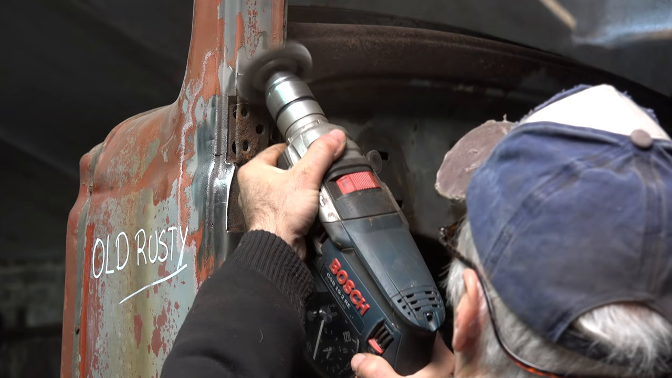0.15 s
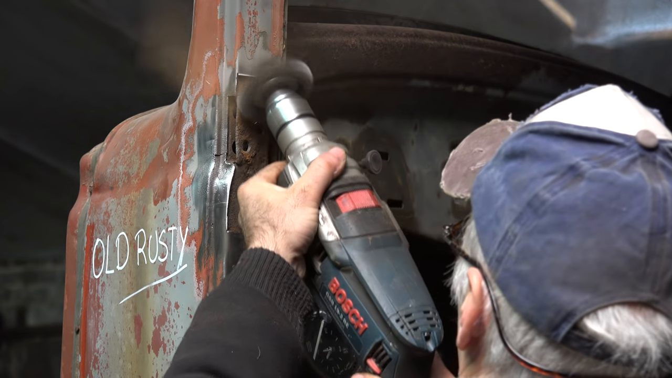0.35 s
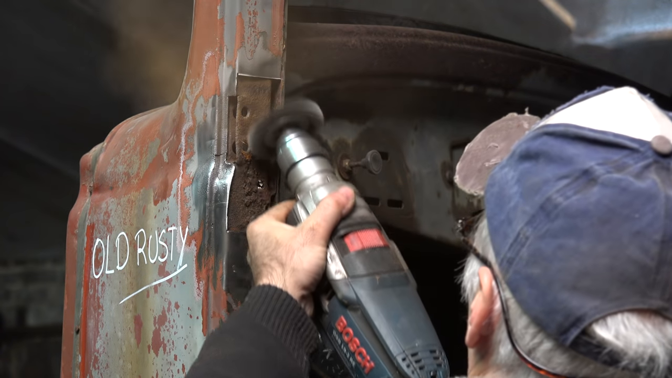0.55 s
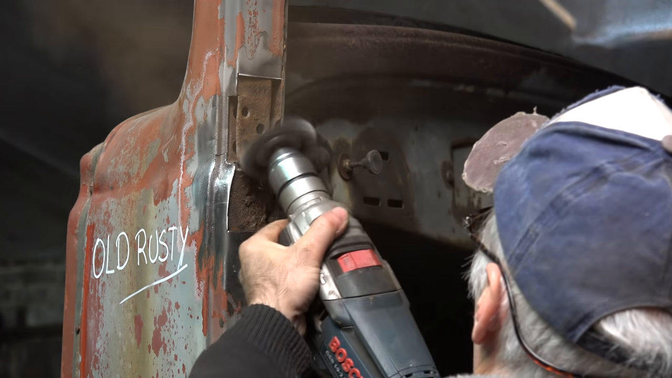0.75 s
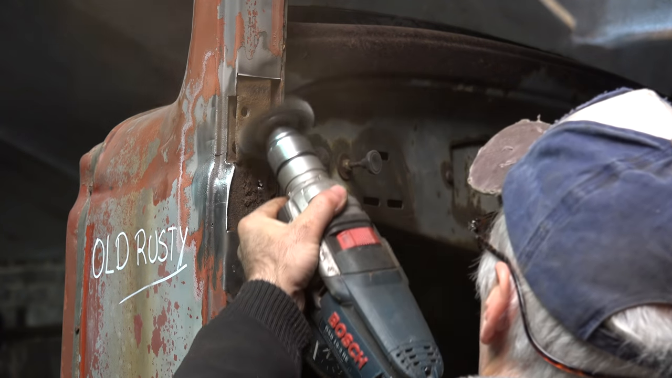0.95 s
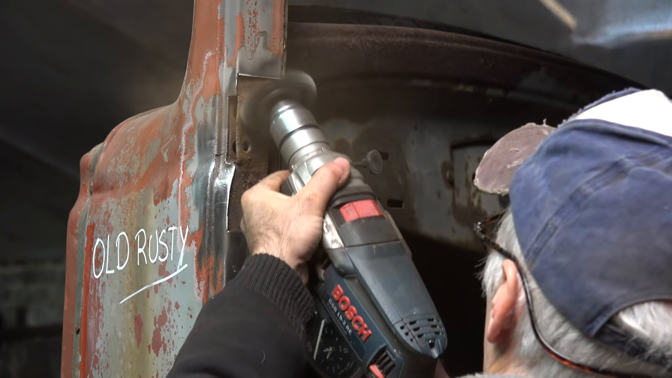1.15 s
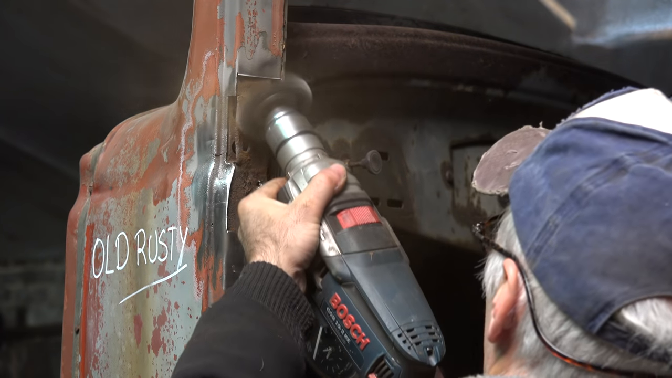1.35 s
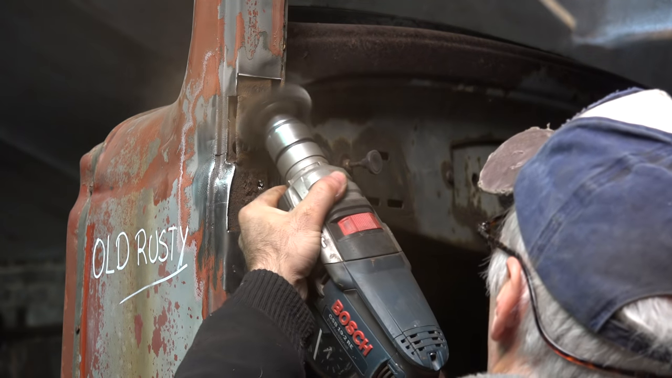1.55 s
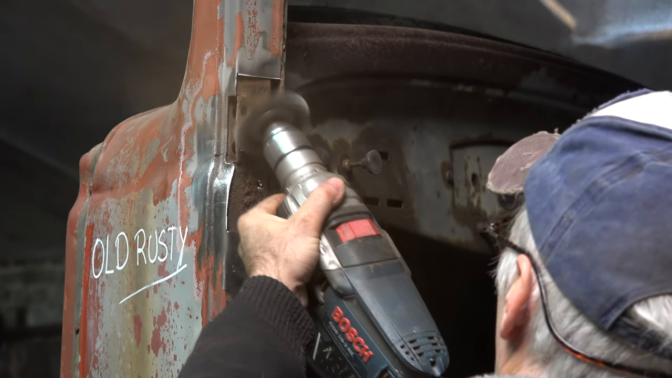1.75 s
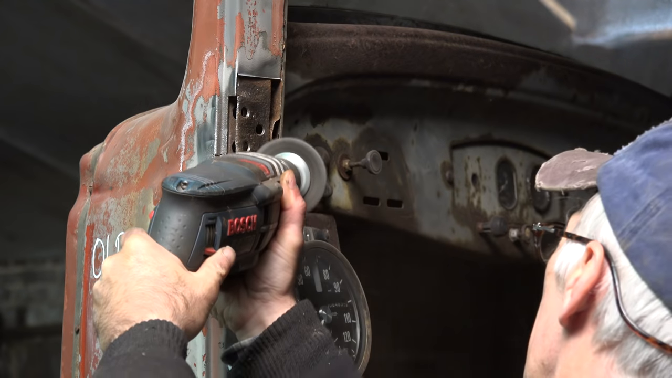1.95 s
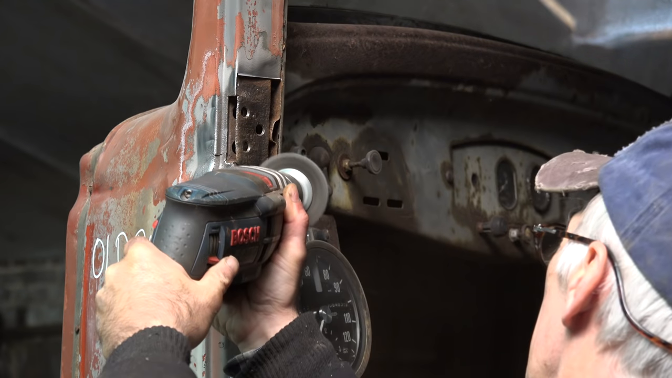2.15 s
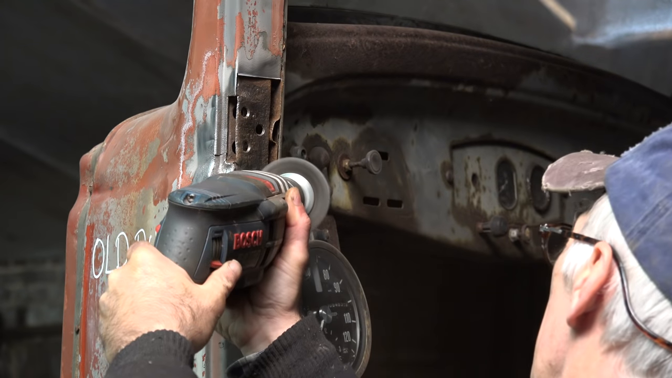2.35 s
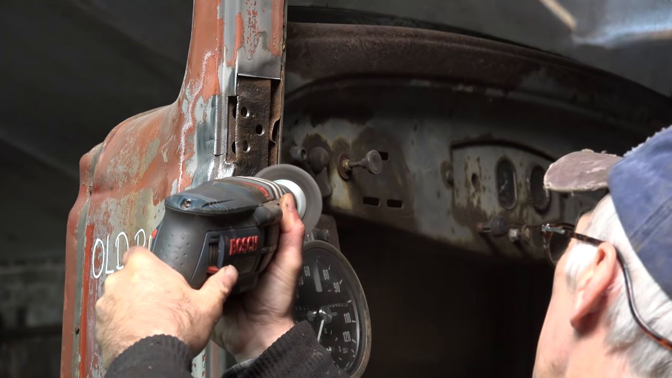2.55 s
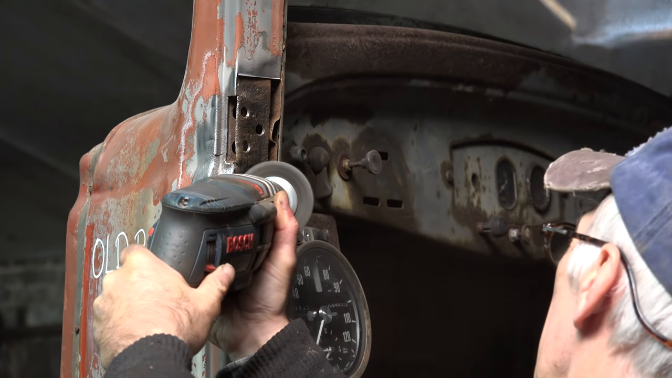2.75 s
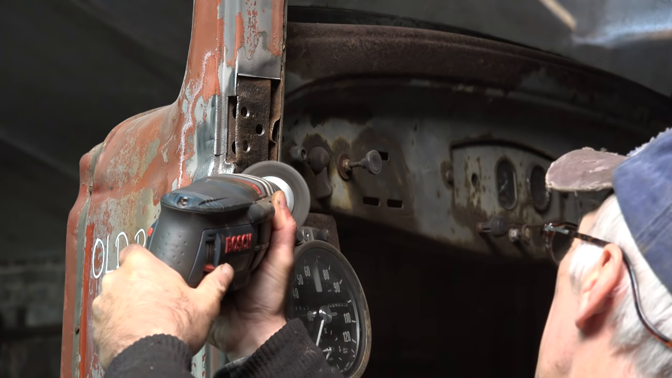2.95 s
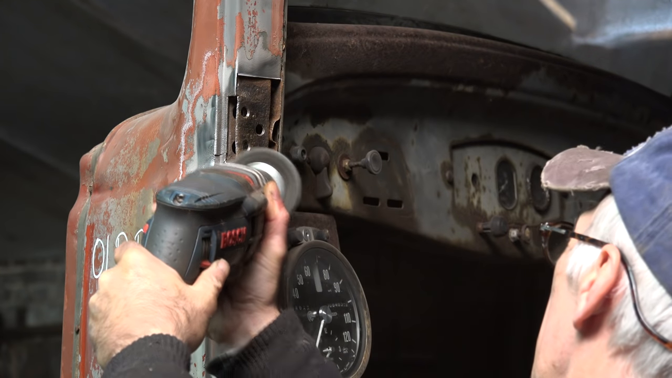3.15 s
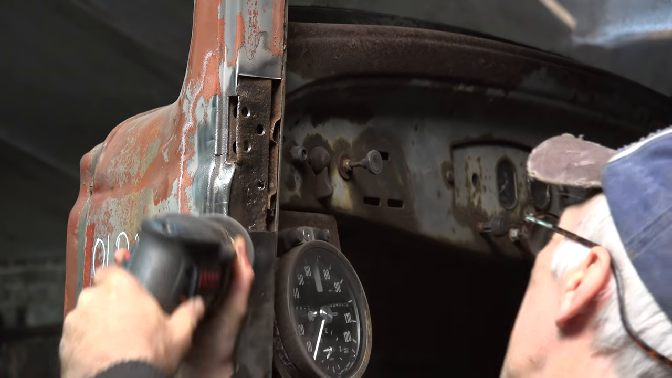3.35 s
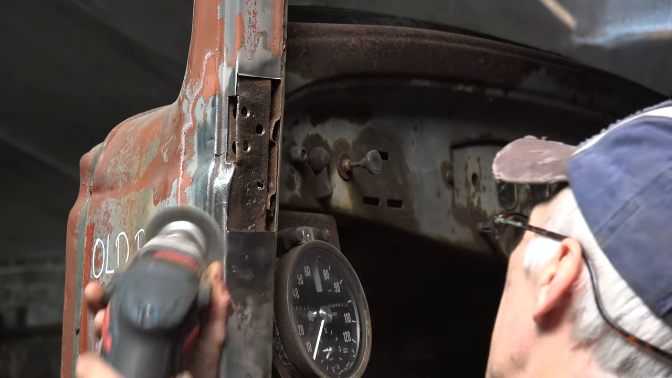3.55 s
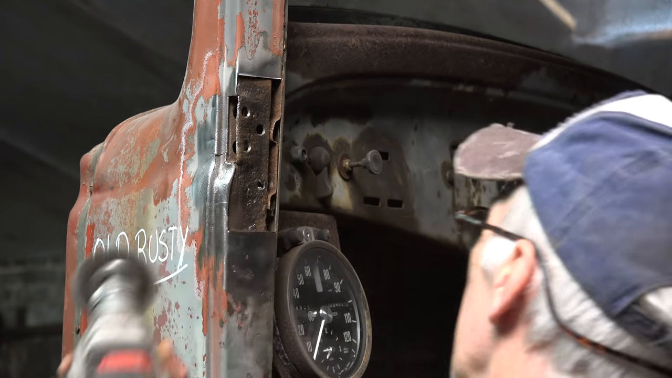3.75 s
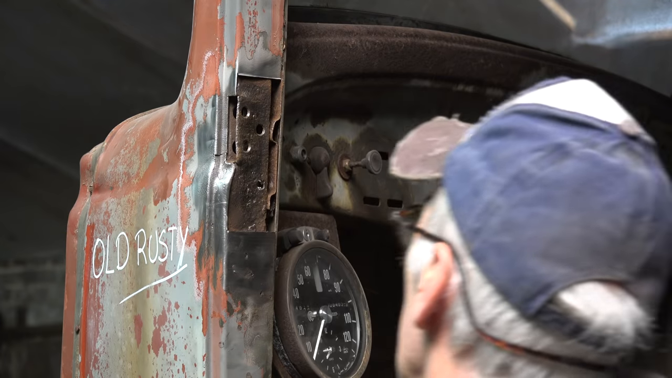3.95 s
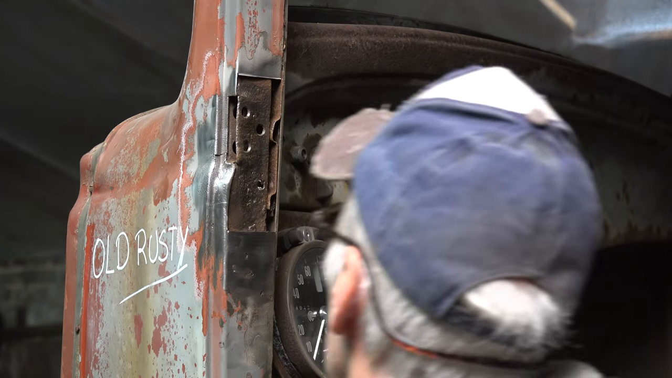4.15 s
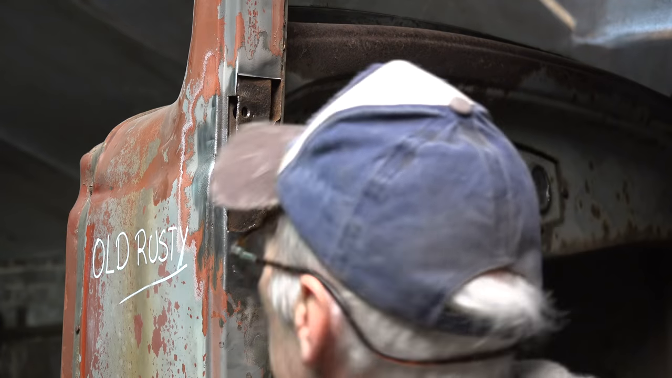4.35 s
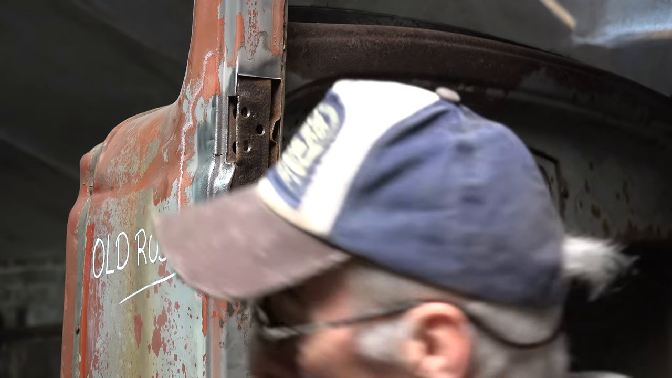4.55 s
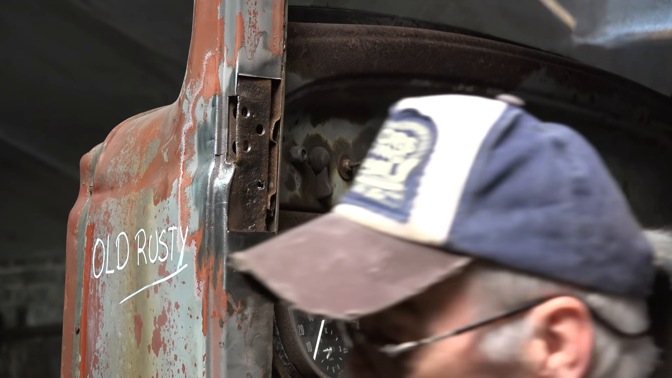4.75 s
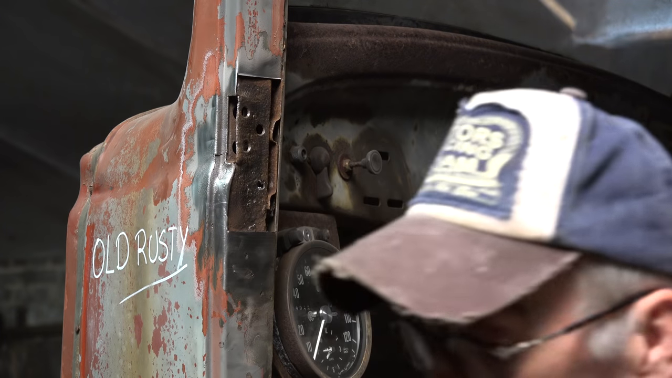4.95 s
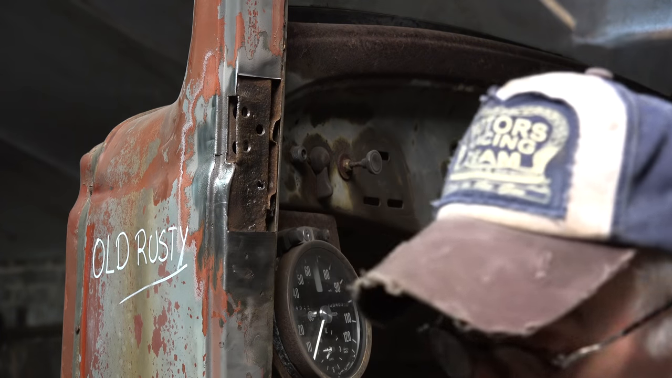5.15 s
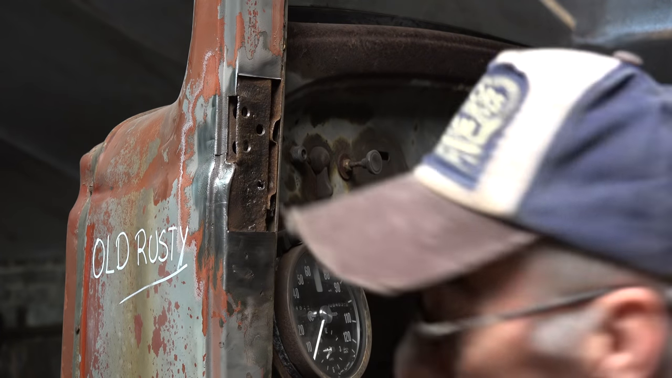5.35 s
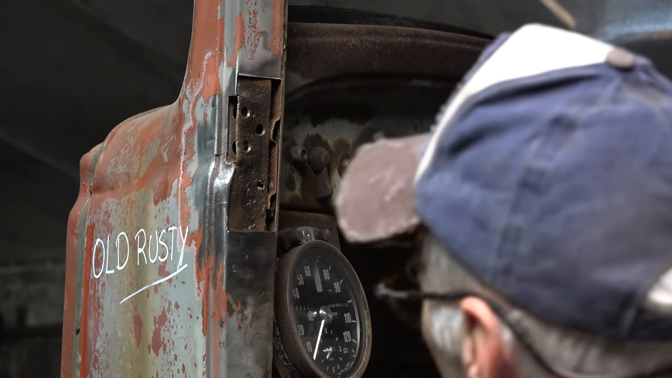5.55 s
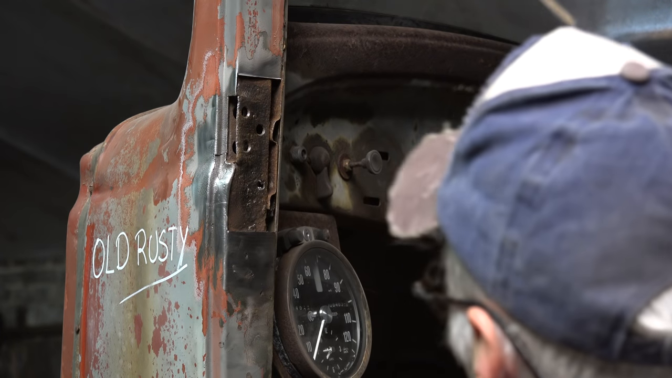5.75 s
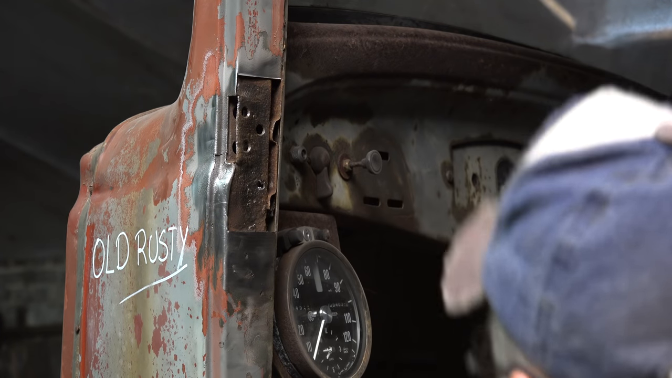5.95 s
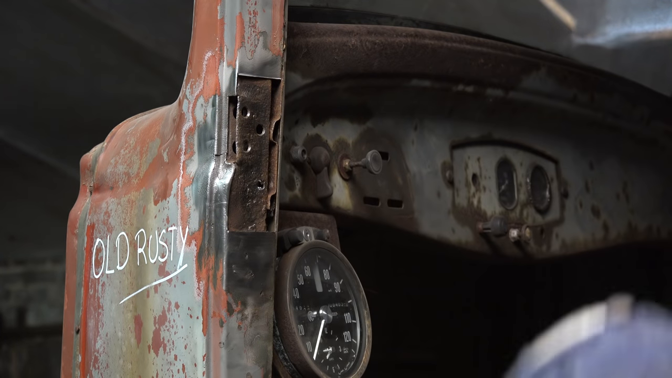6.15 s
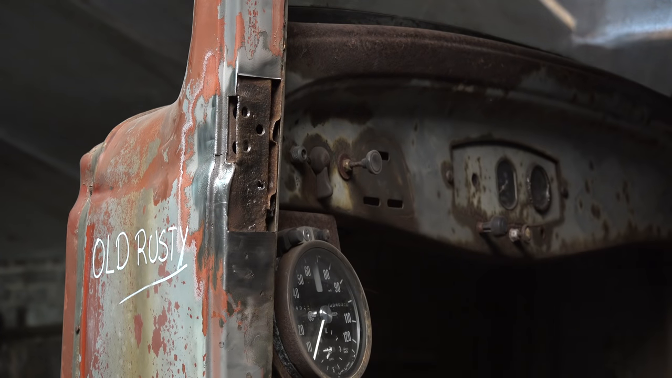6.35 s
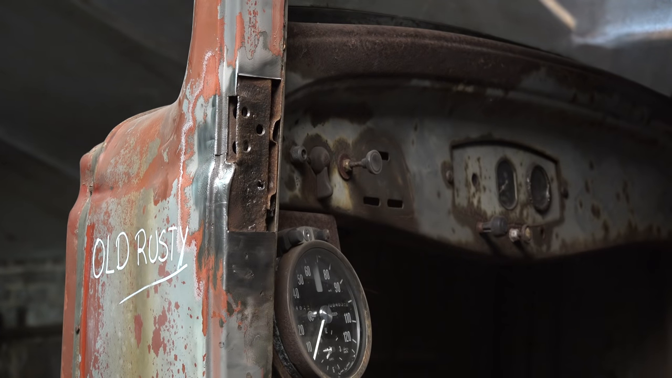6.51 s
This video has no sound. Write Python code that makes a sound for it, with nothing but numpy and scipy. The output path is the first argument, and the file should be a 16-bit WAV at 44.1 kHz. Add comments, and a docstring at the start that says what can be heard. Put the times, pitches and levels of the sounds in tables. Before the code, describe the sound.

Harsh wire-brush hiss and drill whine on sheet metal, a clanking rebound, then the released motor coasts down in falling pitches to quiet.

```python
"""A quiet workshop, one microphone: an electric drill with a wire wheel scours rusty sheet metal.
Wire tips make a dense hiss coloured by the panel; the uneven wheel and armature hum; gears, fan and brushes
whine at multiples of the armature speed. The wheel kicks once against the panel and rebounds, ringing the
sheet; the sound jumps once in level and colour, the wheel lifts off, the trigger is released and the motor
coasts to rest, its whines falling through the housing resonances among small ticks and soft knocks."""
import sys
import numpy as np
from scipy import signal
from scipy.fft import rfft, irfft
from scipy.io import wavfile
from scipy.ndimage import uniform_filter1d

SR = 44100
rng = np.random.default_rng(int(sys.argv[2]) if len(sys.argv) > 2 else 0)


def master(y):
    """Save y as 16-bit WAV."""
    cut = np.clip(np.atleast_2d(y).T, -1, 1)
    pcm = np.round(cut * 32767)  # scale
    wavfile.write(sys.argv[1], SR, pcm.astype(np.int16))


def how_loud(loudness_db):
    """Turn decibels into a plain amplitude multiplier (0 dB gives 1, 20 dB gives 10)."""
    steps = np.asarray(loudness_db, float) / 20
    return 10 ** steps


N = 294588

# wires on the metal, one table per passage: start_s, level_db, low_share_db, brightness_db
SCOUR_PASSAGES = [
    [(0.0, -13, 0.8, 1.5), (0.76, -12.5, 1, 2.5), (0.8, -14.5, 6.3, 0.5), (0.93, -12.5, 0.5, 3),
     (2.03, -12.5, 0.1, 1)],
    [(2.04, -15.5, 4, -1), (2.06, -15.5, 0.2, 2.4), (3.212, -15.5, 0.9, 1.5), (3.34, -16.5, 1.5, 0.3)],
]
# colour of the scoured panel, one table per passage: pitch_hz, density_db (per Hz)
PANEL_COLOURS = [
    [(18, -60.5), (30, -25), (75, -15.5), (133, -19.5), (168, -18), (256, -9.5), (606, -3), (1510, -2.5),
     (1820, -1), (2420, -6), (3590, -0.5), (6210, -8), (15500, -11.5)],
    [(18, -53), (30, -10.5), (97, -33), (168, -15.5), (243, -16.5), (467, -5), (874, -0.5), (945, 0),
     (1510, -4.5), (3590, -8.5), (4780, -7), (8720, -5.5), (15500, -16)],
]
# broad ringing of the panel, one table per passage: pitch_hz, width_hz, lift_db
PANEL_HUMPS = [
    [(1900, 120, 1.5), (3330, 1100, 2), (5200, 1200, 3), (9900, 3000, 4)],
    [(950, 1200, -2), (4600, 1600, 3.5), (6260, 620, 2.5), (10000, 1400, 2.5)],
]

# blows and rebounds of the wheel on the panel: start_s, level_db (peak before the bass is cut)
KICK_BLOWS = [(.767, 2), (.772, -1), (.778, -2.5), (.789, 0.5), (.799, -7.5), (.807, -5), (.846, -7.5),
              (0.856, -3), (.901, -9.5), (.91, -8), (0.959, -14.5), (.969, -10.5)]
# ringing modes of the sheet: pitch_hz, level_db, t60_s
PANEL_MODES = [(80.5, -10, 0.22), (230, -11.5, 0.13), (356, 7, 0.04), (510, -5, 0.08), (629, -2, 0.045),
               (1727, -5, .03)]
SAG_PER_S = .65  # share of the mode pitch lost per second after the first blow
DULL_DB, DULL_DB_PER_S = -2, 60  # treble loss in dB per octave at the first blow, and its growth per second

# speed under load, sagging as the wheel is pressed and racing once it lifts: start_s, speed_turns_per_s
LOADED_SPEED = [(0, 459.7), (.2, 454.1), (.5, 452.5), (.65, 455.1), (.8, 467.4), (.95, 471.8), (1.1, 474.2),
                (1.25, 472.4), (1.55, 463.1), (1.85, 457.3), (2, 459.2), (2.15, 465.7), (2.45, 462.1),
                (3.05, 462.5), (3.2, 458.4), (3.3, 466.9), (3.38, 480.3), (3.46, 490.3)]
# braking by brushes, gears and fan after release: speed_turns_per_s, loss_turns_per_s (each second)
DRAG = [(0, 93.6), (110, 128), (200, 148.7), (330, 228.4), (491, 327.6)]
JUMP_S, LIFT_S, RELEASE_S = 2.035, 3.36, 3.491  # the sound jumps; the wheel lifts; the trigger is let go
TOP_SPEED = 491  # armature turns per second
GEAR_RATIO = 10.75  # armature turns per wheel turn

# main whines: multiple (of the armature speed); the first FAN_COUNT belong to the fan
WHINE_ORDERS = [17, 19, 34, 12, 24, 36, 48]
FAN_COUNT = 3
# their full-speed levels before housing and aim: first_passage_db, second_passage_db, free_db
WHINE_LEVELS = [(-23.7, -34.7, -32.8), (-64.1, -39.1, -42.8), (-12.3, -27.0, -27.7), (-29.5, -42.8, -55.4),
                (-29.8, -42.9, -40.3), (-40.0, -40.0, -45.0), (-40.0, -40.0, -40.0)]
SLOTS, FIRST_SLOT, TOP_SLOT = 12, 5, 18  # armature slots; lowest and highest multiple of them heard
# higher slot multiples weaken evenly; odd ones miss the commutator
SLOT_DB, SLOT_DB_PER_ORDER, ODD_DB = -43.5, -.15, -3.5
FAN_DB_PER_HALVING, SLOT_DB_PER_HALVING = -23.5, -9.1  # air tones die faster as the speed halves
# how housing and vents pass a whine: pitch_hz, gain_db
HOUSING_PASS = [(900, 2.3), (1300, 9.5), (1900, 10.4), (2200, 4.7), (2700, -3.9), (3500, -2.6),
                (4400, -5.8), (5400, -2.0), (5800, -0.6), (6300, -0.9), (6900, -1.2), (7700, 1.0),
                (8100, 3.9), (8800, 5.5), (9700, 0.1), (10300, -0.6), (10900, 1.0), (11400, -0.4),
                (12000, -2.8), (13200, -5.1), (14500, -10.2), (15800, -12.1)]
# narrow resonances of the housing: pitch_hz, width_hz, lift_db
HOUSING_PEAKS = [(1870, 150, 1.5), (2210, 340, 6), (4100, 220, 3), (5440, 230, 5.5), (8800, 900, 4),
                 (11800, 460, -3)]
CHIRP_SHARE = .4  # share of that lift given to a whine crossing a resonance
# the vents turn toward and away from the microphone: start_s, gain_db
VENT_AIM = [(0.0, -8.5), (0.45, -5.9), (0.7, -7.1), (0.82, -10.7), (1.0, -4.6), (1.37, -17.2), (1.6, -12.4),
            (1.93, -9.9), (2.15, -11.9), (2.5, 0.7), (3.04, 4.7), (3.32, -6.7), (3.46, 8.3), (3.6, -0.5),
            (3.85, 9.2), (4.1, -0.9), (4.4, 4.6), (4.65, 5.8), (4.85, 3.4), (5.1, 11.5), (5.4, 9.2),
            (5.7, 10.9), (6.0, 6.3), (6.3, 11.9)]
# moments when one whine stands out or fades: centre_s, multiple, half_width_s, change_db
FLARES = [(.4, 24, .25, 4), (.98, 17, .1, 3), (1.52, 17, .29, 11), (1.86, 24, .12, 8.6),
          (2.01, 34, .12, 6.9), (2.19, 17, .17, 15), (2.2, 24, .24, 9), (3.84, 34, .2, 3),
          (4.04, 17, .06, -8), (4.08, 12, .59, 22), (4.36, 24, .24, 16), (4.53, 60, .13, 13),
          (4.59, 12, .11, 13.4), (4.62, 17, .67, 17.5), (4.62, 36, .08, 12), (4.9, 84, .12, 6),
          (4.95, 12, .12, 11.5), (5.05, 36, .15, 5), (5.12, 24, .08, 8), (5.24, 48, .24, 8),
          (5.24, 72, .1, 7), (5.31, 36, .12, 7), (5.38, 60, .12, 7), (5.5, 96, .1, 7), (5.53, 120, .09, 6),
          (5.47, 24, .07, -7), (5.59, 48, .09, -10), (5.68, 24, .07, 4), (5.72, 144, .12, 6),
          (5.84, 36, .05, 7), (5.88, 72, .04, 9), (5.9, 48, .2, 7), (6.1, 48, .08, 7)]
WAVER_DB, FLUTTER_DB = 2.5, 1.8  # slow drift of each whine; roughness from sparking brushes
TURN_THROB = .45  # depth of the throb of an uneven armature, once a turn
EDGE_HZ = 15900  # top of the heard band

# hum of the uneven wheel as it is pressed home: start_s, fourth_multiple_db
WHEEL_FOURTH = [(0, -36.5), (.09, -28), (.23, -41), (.29, -31), (.61, -30.5), (.77, -39.5), (.83, -24),
                (.89, -39), (.95, -31), (1.08, -48), (1.14, -34.5), (1.29, -48.5), (1.37, -38),
                (1.59, -35.5), (1.76, -25.5), (2.02, -44), (2.29, -41.5), (3.19, -37), (3.29, -38),
                (3.36, -34), (3.62, -51.5)]
# 2nd and 3rd wheel multiples, one row each, at usual pressure: first_passage_db, second_passage_db, lifted_db
WHEEL_LOW = [(-44, -60, -50), (-47, -47, -48)]
USUAL_DB, FOLLOW = -34, .3  # 4th multiple at usual pressure; share of its changes that those two follow
# weaker multiples of the wheel speed: multiple, level_db (relative to the smoothed 4th)
WHEEL_ORDERS = [(5, -13), (8, -11), (10, -8.5), (11, -15), (14, -9), (15, -8)]
# unbalance of the armature, rows once and twice a turn: first_passage_db, second_passage_db, free_db
UNBALANCE = [(-73.5, -41, -40), (-70.5, -33.5, -43)]
UNBALANCE_END_S = 3.8
# short low swells near twice the wheel speed: start_s, level_db, pitch_hz
LOW_SWELLS = [(.86, -30, 85), (1.05, -26, 87), (3.27, -40, 85.5)]

# air driven by the fan: start_s, level_db, low_share_db, brightness_db
FAN_AIR = [(3.48, -14, -1, 3.5), (3.632, -17, -2, 1), (3.82, -17.5, -3, -3.5), (4.398, -21.5, 0, -4),
           (4.706, -29.5, -0.2, -3.5), (5.2, -40.5, 4.5, -1.5)]
# colour of the vents: pitch_hz, density_db (per Hz)
VENT_COLOUR = [(18, -50), (30, -19), (148, -16.5), (430, -2), (637, -0.5), (894, 1), (1360, -1.5),
               (1810, -5), (2540, -6), (3570, -6), (4170, -1.5), (6680, -3.5), (10400, -7), (13900, -9.5),
               (15400, -9.5)]
# broad ringing of the vents: pitch_hz, width_hz, lift_db
VENT_HUMPS = [(4800, 500, 1), (8900, 1700, 2.5)]
# a breathy fan band that falls with the speed: start_s, level_db
FAN_RUSH = [(3.55, -34), (3.75, -31.5), (3.95, -27.5), (4.2, -30.5), (4.5, -36.5), (4.7, -47)]
# noise of the slowing gears: start_s, level_db, low_share_db, brightness_db
GEAR_NOISE = [(4.5, -37, 4, -3.0), (4.558, -29.5, -1, 8), (5.724, -42.5, -7.5, -1.5), (6.178, -51, -14, -9),
              (6.306, -56.5, -22, -13), (6.42, -66, -4.0, -5)]
# colour of the gearbox: pitch_hz, density_db (per Hz)
GEARBOX_COLOUR = [(35, -41), (60, -10), (780, 1.5), (1010, 3.5), (1850, -4.5), (2880, -11), (5530, -13.5),
                  (6670, -14.5), (11900, -12), (15800, -21)]

# small ticks: start_s, level_db, pitch_hz
TICKS = [(5.243, -30, 4000), (5.338, -33, 3500), (5.437, -28, 4100), (5.505, -38, 4300), (5.6, -36, 4000),
         (6.007, -36, 4300), (6.369, -45, 7000)]
# soft knocks: start_s, level_db, pitch_hz
THUDS = [(4.64, -40, 60.6), (4.7, -41, 70), (5.48, -43, 180), (5.56, -46, 150), (5.89, -42, 220),
         (5.96, -49, 150), (6.209, -53, 130), (6.47, -54, 79.8), (6.5, -49.5, 110), (6.53, -53, 80),
         (6.6, -52, 150), (6.63, -50, 190), (6.65, -52, 70)]
# colour of the workshop and microphone floor: pitch_hz, density_db (per Hz, relative)
ROOM_COLOUR = [(12, -35.5), (20, 0), (70, -3.5), (158, -7.5), (375, -8), (419, -11.5), (819, -12.5),
               (2120, -17), (5620, -18.5), (14500, -28), (15800, -35.5)]
ROOM_DB = -60.5  # rms level of the floor


def along(rows):
    """Columns of a curve table at every sample."""
    s, *columns = np.transpose(rows)
    return [np.interp(np.arange(N) / SR, s, column) for column in columns]


def read(points, hz):
    """A colour read at the given frequencies, straight between points on a log scale."""
    f, value = np.transpose(points)
    return np.interp(np.log(hz + 1), np.log(f + 1), value)


def peaks_db(peaks, hz):
    """Summed lift of resonances, each a bell around its own pitch."""
    return sum(lift / (1 + (2 * (hz - f) / width) ** 2) for f, width, lift in peaks)


def evened(x):
    """Scaled to rms 1."""
    return x / np.sqrt(np.mean(x ** 2) + 1e-20)


def inside(rows, rise, fall):
    """1 while a table lasts; power fades in over rise seconds before it and out over fall seconds after."""
    s = np.arange(N) / SR
    nearest = np.minimum((s - rows[0][0]) / rise, (rows[-1][0] - s) / fall)
    return np.sqrt(np.clip(nearest + 1, 0, 1))


def waver(count, seconds):
    """Slow random curves, drawn straight between normal random knots."""
    knots = rng.standard_normal((count, 400))
    return [np.interp(np.arange(N) / SR / seconds, np.arange(400), row) for row in knots]


def tone(angle, db):
    """A sine of the given rms level and random starting phase."""
    return np.sqrt(2) * how_loud(db) * np.sin(angle + 2 * np.pi * rng.random())


def by_passage(first_db, second_db, free_db):
    """A level that glides quickly where the sound jumps and again at lift-off."""
    return along([(JUMP_S - .01, first_db), (JUMP_S + .01, second_db),
                  (LIFT_S - .05, second_db), (LIFT_S + .05, free_db)])[0]


def hiss(rows, colour, grain_db, patchy_db, fade, peaks=()):
    """Dense grains of uneven size through a colour whose bass and treble shares move; patches drift in it."""
    size_db = grain_db * evened(uniform_filter1d(rng.standard_normal(N), size=24))
    grains = rng.standard_normal(N) * how_loud(size_db)
    grains = grains + how_loud(-8) * workshop(grains, t60=0.31)  # reflections comb the colour finely
    hz, s, z = signal.stft(grains, SR, nperseg=1024, noverlap=768)
    level_db, low_db, bright_db = along(rows)
    at = np.minimum((s * SR).astype(int), N - 1)

    patches = uniform_filter1d(rng.standard_normal(z.shape), size=12, axis=0)
    patches = uniform_filter1d(patches, size=10, axis=1)
    low = 1 / (1 + (hz / 1500) ** 4)
    high = 1 / (1 + (7000 / (hz + 1)) ** 4)
    colour_db = read(colour, hz) + peaks_db(peaks, hz)
    shape = how_loud(colour_db[:, None] + np.outer(low, low_db[at]) + np.outer(high, bright_db[at]))
    shape *= how_loud(patchy_db * evened(patches)) / np.sqrt(np.mean(shape ** 2, axis=0))
    shaped = signal.istft(z * shape, nperseg=1024, noverlap=768)[1][:N]
    return evened(shaped) * how_loud(level_db) * inside(rows, *fade)


def scour(angle):
    """Wire tips rake the rust; the uneven wheel presses a little harder once a turn."""
    throb = 1 + 0.031 * np.cos(angle / GEAR_RATIO)
    first = hiss(SCOUR_PASSAGES[0], PANEL_COLOURS[0], grain_db=0.5, patchy_db=0.57, fade=(.004, .005),
                 peaks=PANEL_HUMPS[0])
    second = hiss(SCOUR_PASSAGES[1], PANEL_COLOURS[1], grain_db=1.0, patchy_db=0.76, fade=(.005, .14),
                  peaks=PANEL_HUMPS[1])
    return throb * (first + second)


def kicks():
    """Each blow rings the low modes of the panel, lower and duller as the rebounds go on."""
    t, out = np.arange(SR // 3) / SR, np.zeros(N)
    for s, peak_db in KICK_BLOWS:
        late = s - KICK_BLOWS[0][0]
        pitch = 1 - SAG_PER_S * late
        dull_db = DULL_DB + DULL_DB_PER_S * late
        ring = np.zeros(len(t))
        for hz, db, t60 in PANEL_MODES:
            octaves = max(np.log2(hz / 370), 0)
            ring += how_loud(db - dull_db * octaves - 60 * t / t60) * np.sin(2 * np.pi * hz * pitch * t)
        out[round(s * SR):][:len(t)] -= how_loud(peak_db) * ring / abs(ring).max()
    # the blows carry no deep bass
    return signal.sosfilt(signal.butter(4, 70, "high", fs=SR, output="sos"), out)


def armature_speed():
    """Turns per second: the loaded speed until release, then the drag law run down to rest."""
    turns = np.linspace(TOP_SPEED, 0, num=2000)
    step_s = (turns[0] - turns[1]) / np.interp(turns, *np.transpose(DRAG))
    reached_s = RELEASE_S + np.cumsum(step_s)
    return along(list(LOADED_SPEED) + list(zip(reached_s, turns)))[0]


def whines(speed, angle):
    """Tones locked to the armature weaken as it slows, swell through the housing resonances and waver."""
    slots, s = np.arange(FIRST_SLOT, TOP_SLOT + 1), np.arange(N) / SR
    slot_levels = SLOT_DB + SLOT_DB_PER_ORDER * slots + ODD_DB * (slots % 2)
    levels = [by_passage(*row) for row in WHINE_LEVELS] + list(slot_levels)
    orders = list(WHINE_ORDERS) + list(SLOTS * slots)
    aim_db = along(VENT_AIM)[0]
    halvings = np.log2(TOP_SPEED / (speed + 1))
    out = np.zeros(N)
    for k, db, drift in zip(orders, levels, waver(len(orders), seconds=.045)):
        hz = k * speed
        is_fan = k in WHINE_ORDERS[:FAN_COUNT]
        slowing_db = halvings * (FAN_DB_PER_HALVING if is_fan else SLOT_DB_PER_HALVING)
        flare_db = sum(change * np.exp(-((s - centre) / width) ** 2)
                       for centre, order, width, change in FLARES if order == k)
        ring_db = read(HOUSING_PASS, hz) + CHIRP_SHARE * peaks_db(HOUSING_PEAKS, hz)
        flutter_db = FLUTTER_DB * evened(uniform_filter1d(rng.standard_normal(N), size=250))
        # each tone fades out at the bottom and top of the heard range
        heard = np.clip((hz - 700) / 300, 0, 1) * np.clip((EDGE_HZ - hz) / 100, 0, 1)
        total_db = db + aim_db + slowing_db + flare_db + ring_db + WAVER_DB * drift + flutter_db
        out += heard * tone(k * angle, total_db)
    return out * (1 + TURN_THROB * np.cos(angle))


def hums(angle):
    """Low multiples of the wheel and armature speeds, from an uneven wheel and an unbalanced armature."""
    fourth_db, turn = along(WHEEL_FOURTH)[0], angle / GEAR_RATIO
    wheel = tone(4 * turn, fourth_db)
    for k, row, drift in zip((2, 3), WHEEL_LOW, waver(2, seconds=.12)):
        wheel += tone(k * turn, by_passage(*row) + FOLLOW * (fourth_db - USUAL_DB) + 3 * drift)
    press_db = uniform_filter1d(fourth_db, size=SR // 4)
    for (k, db), drift in zip(WHEEL_ORDERS, waver(len(WHEEL_ORDERS), seconds=0.17)):
        wheel += tone(round(k) * turn, press_db + db + 4 * drift)

    shake = np.zeros(N)
    for k, row, drift in zip((1, 2), UNBALANCE, waver(2, seconds=0.073)):
        shake += tone(k * angle, by_passage(*row) + 2.5 * drift)
    shake *= inside([[0], [UNBALANCE_END_S]], 0.03, 0.04)
    return wheel * inside(WHEEL_FOURTH, .05, .05) + shake


def fan_air():
    """Air driven through the vents: a hiss that weakens as the motor coasts."""
    return hiss(FAN_AIR, VENT_COLOUR, grain_db=-1.2, patchy_db=0.72, fade=(.16, .3), peaks=VENT_HUMPS)


def fan_rush(angle):
    """Narrow fan noise carried on a multiple of the armature speed."""
    fuzz = signal.lfilter(*signal.butter(2, 170, fs=SR), rng.standard_normal((N, 2)), axis=0).T
    band = fuzz[0] * np.cos(3.6 * angle) + fuzz[1] * np.sin(3.6 * angle)
    return evened(band) * how_loud(along(FAN_RUSH)[0]) * inside(FAN_RUSH, 0.042, .05)


def gear_noise():
    """The slowing gears: grainy noise that rings the resonances of the housing."""
    return hiss(GEAR_NOISE, GEARBOX_COLOUR, grain_db=3.0, patchy_db=0.1, fade=(.2, .03), peaks=HOUSING_PEAKS)


def pulses(rows, cycles, noisy):
    """Short damped pulses, a few cycles of their own pitch with a puff of noise, rising over half a cycle."""
    out, t = np.zeros(N + SR), np.arange(SR // 8) / SR
    for s, db, hz in rows:
        body = (1 - noisy) * np.sin(2 * np.pi * hz * t) + noisy * rng.standard_normal(len(t))
        envelope = np.exp(-t * hz / cycles) * np.minimum(2 * t * hz, 1)
        out[round(s * SR):][:len(t)] += how_loud(db) * body * envelope
    return out[:N]


def workshop(x, t60):
    """Sparse reflections of random sign, dying away by 60 dB in t60 seconds."""
    at = np.arange(300, SR // 2, 22)
    signs = rng.choice([-1., 1.], len(at))
    taps = np.zeros(SR)
    taps[at + rng.integers(0, 22, len(at))] = signs * how_loud(-60 * at / SR / t60)
    return signal.oaconvolve(x, taps / np.linalg.norm(taps))[:N]


def room_tone():
    """The faint steady floor of the workshop and microphone: coloured noise."""
    z = rfft(rng.standard_normal(N)) * how_loud(read(ROOM_COLOUR, np.fft.rfftfreq(N, 1 / SR)))
    return how_loud(ROOM_DB) * evened(irfft(z, N))


def scene():
    """All sources with their reflections, the same in both channels."""
    speed = armature_speed()
    angle = 2 * np.pi * np.cumsum(speed) / SR
    clear = whines(speed, angle)
    clear += pulses(TICKS, 3.4, 0.058) + pulses(THUDS, 1.3, .03) + pulses(LOW_SWELLS, 5.0, .01)
    blows = kicks()
    mix = scour(angle) + hums(angle) + fan_air() + fan_rush(angle) + gear_noise() + room_tone()
    mix += clear + how_loud(-10.5) * workshop(clear, t60=0.68)
    mix += blows + how_loud(-7.5) * workshop(blows, t60=0.47)
    return np.array([mix, mix])


def roll_off(x):
    """The treble ends steeply here."""
    return signal.sosfilt(signal.butter(12, 17090, fs=SR, output="sos"), x)


def record(dry):
    """A limiter ducks everything when the level passes -10 dB and recovers quickly; peaks clip; the band ends."""
    power_db = 10 * np.log10(uniform_filter1d(dry[0] ** 2, size=600) + 1e-12)
    fall = np.arange(N) * 60. / SR  # recovers at this many dB a second
    held_db = np.maximum.accumulate(power_db + fall) - fall
    over_db = np.maximum(held_db + 10.0, 0)
    lag = signal.lfilter([.002], [1, .002 - 1], over_db)  # the first peaks slip through
    ducked = np.clip(dry * how_loud(-.7 * lag), -1, 1)
    edge = signal.firwin(1023, EDGE_HZ, window=("kaiser", 9), fs=SR)
    finished = signal.oaconvolve(ducked, edge[None], "same")
    return roll_off(finished)


dry = scene()
out = record(dry)
master(out)
```